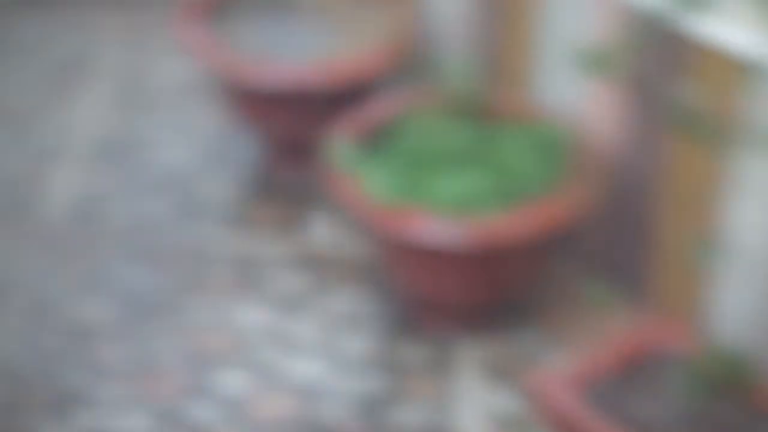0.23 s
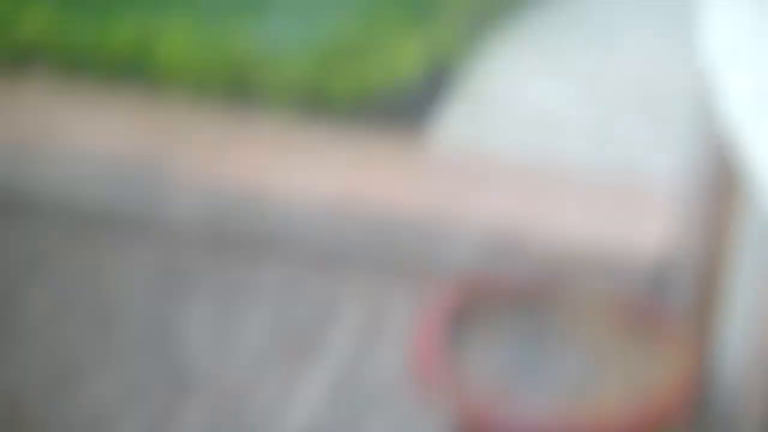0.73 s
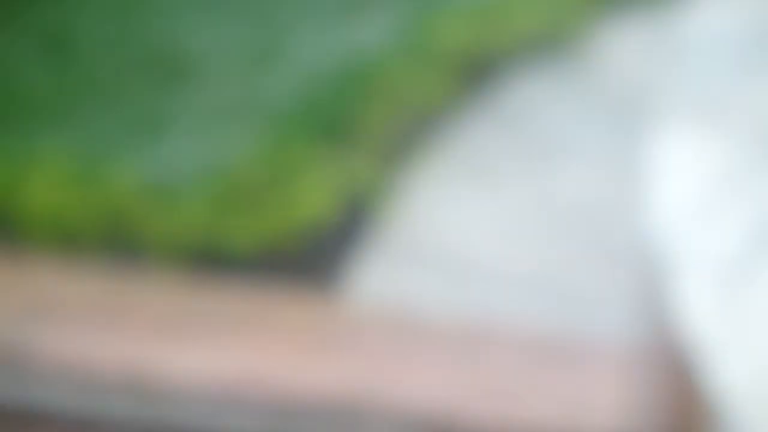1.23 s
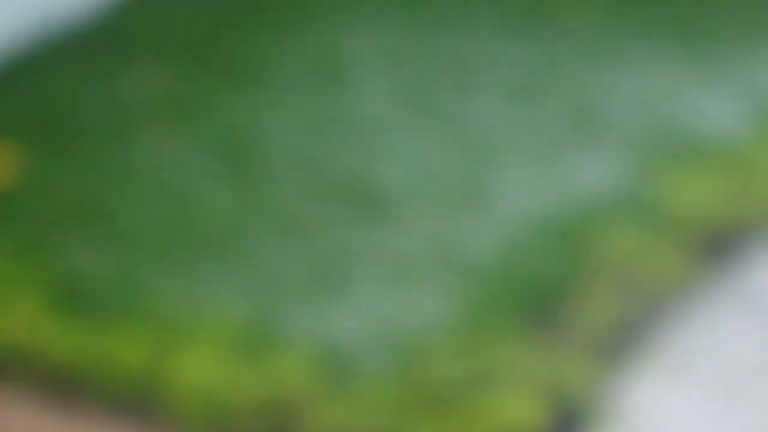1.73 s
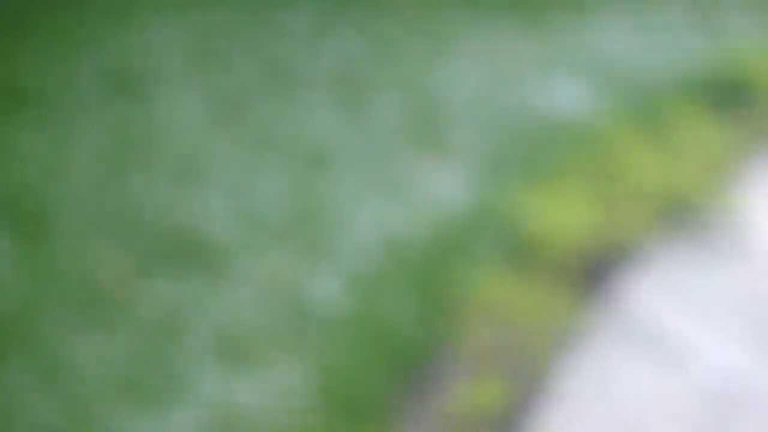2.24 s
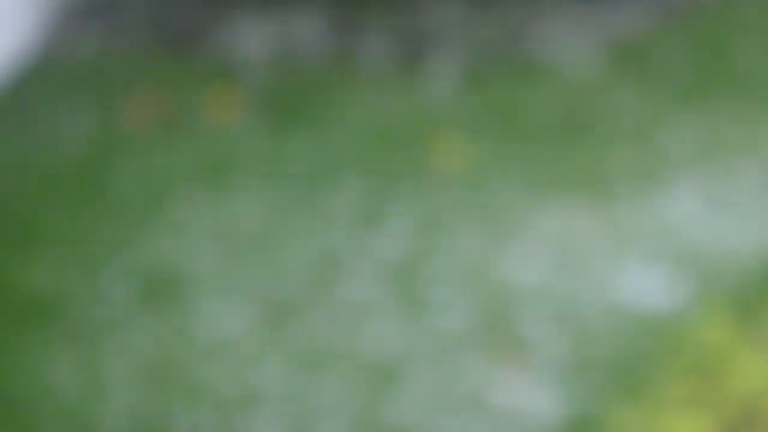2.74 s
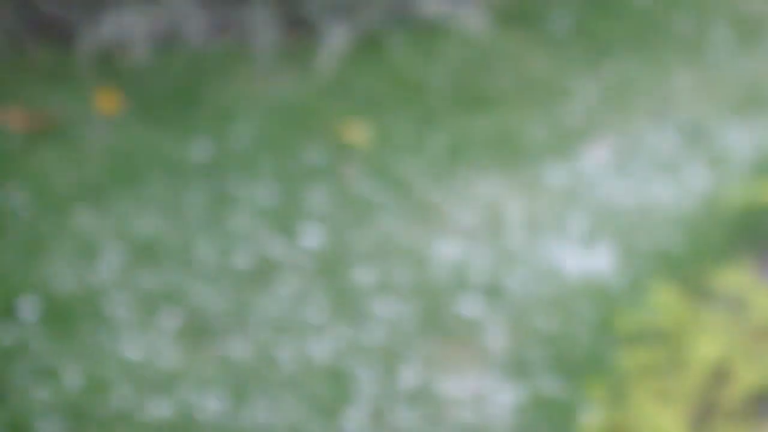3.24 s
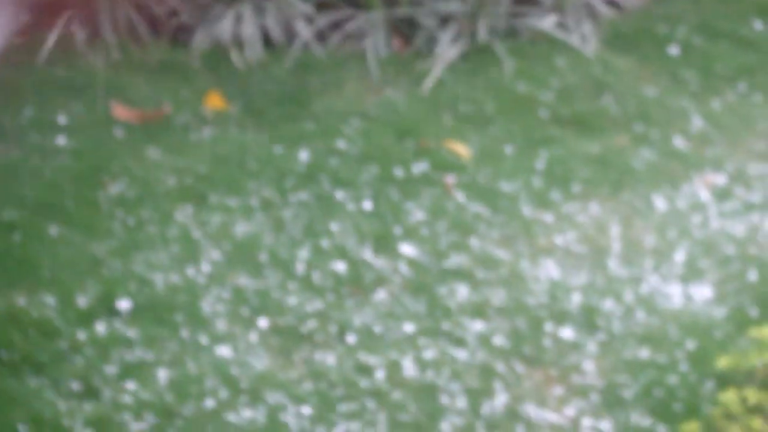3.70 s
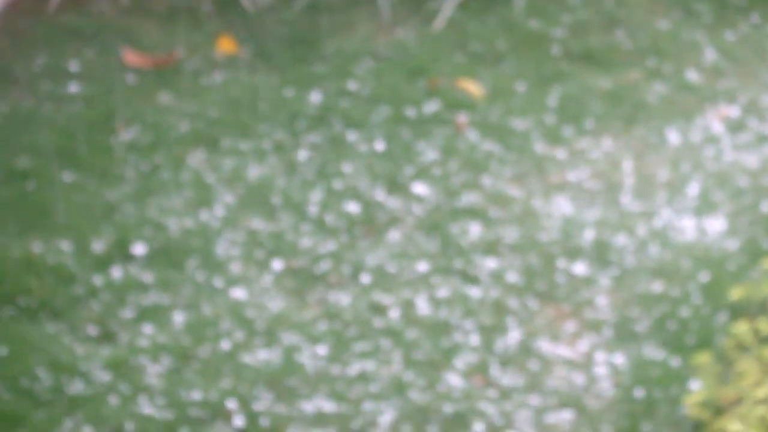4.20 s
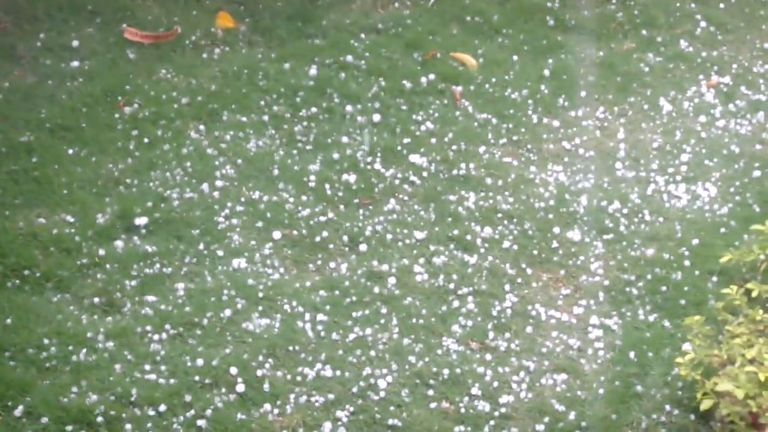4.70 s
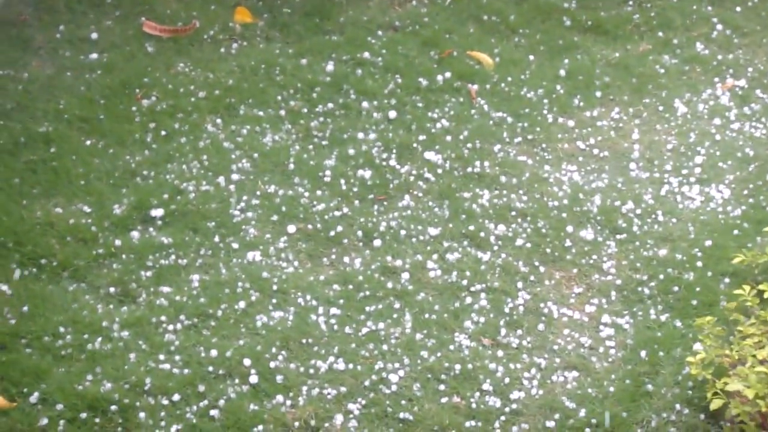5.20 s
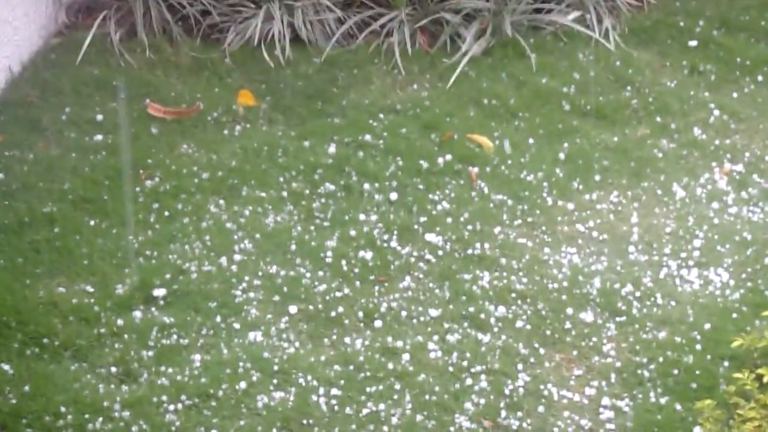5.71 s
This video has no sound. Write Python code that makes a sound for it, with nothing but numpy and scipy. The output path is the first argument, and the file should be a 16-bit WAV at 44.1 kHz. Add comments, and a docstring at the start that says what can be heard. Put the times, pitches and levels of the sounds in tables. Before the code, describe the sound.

Outdoors in a garden, hailstones come down steadily, heard close and wide through a handheld microphone. Sharp clicks on hard ground mix with soft, dull knocks on earth and a few small clay pot pings, over a hiss of countless farther impacts. Later the patter turns lighter and brighter as the knocks recede, with a few returning near the end.

```python
"""Hail on a yard and a lawn

Each impact is a short, damped vibration: stones tick sharply on paving, thud dully on soil, pots and
roof, and now and then ring a clay pot. The far ones superpose into a rush. A handheld camera hears
them through two microphone ports, and the thuds thin out as it turns to the lawn."""
import sys
import numpy as np
from scipy import signal
from scipy.fft import rfft, irfft, next_fast_len
from scipy.io import wavfile
from scipy.ndimage import uniform_filter1d, map_coordinates

SR = 44100
rng = np.random.default_rng(int(sys.argv[2]) if len(sys.argv) > 2 else 0)


def wav_record(signal):
    """Record a signal, one row per channel, as 16-bit PCM in the file named by sys.argv[1]."""
    frames = np.transpose(np.atleast_2d(signal))
    bounded = np.clip(frames, -1, 1)
    # unit amplitude maps onto the largest positive 16-bit level
    quanta = np.round(bounded * 32767).astype(np.int16)
    wavfile.write(sys.argv[1], SR, quanta)


N = 262395

# Phase difference of the ports, negative where the left lags: frequency_hz, left_lead_rad
PORT_PHASE = [(0, -0.5), (520, -1), (1120, -1.5), (3270, -1.84), (6200, -1.5), (8700, -3), (11800, -2.5)]
# Level difference of the ports: frequency_hz, left_minus_right_db
PORT_LEVEL = [(60, -5), (140, 6.5), (350, 4), (840, -0.5), (2010, -1), (4840, -1.5), (11600, 3)]


def amp(db):
    """Amplitude ratio of a level in decibels."""
    return 10 ** (np.asarray(db) / 20)


def unit(x):
    """Normalisation to rms 1."""
    return x / np.sqrt(np.mean(x ** 2) + 1e-20)


def along(points, hz):
    """Interpolation of (frequency_hz, value) points on a logarithmic axis."""
    f, v = np.transpose(points)
    return np.interp(np.log(hz + 1), np.log(f + 1), v)


def wobble(rate_hz):
    """Smooth random modulation: a spline through Gaussian knots."""
    return map_coordinates(rng.standard_normal(int(N * rate_hz / SR) + 4), [np.arange(N) * rate_hz / SR])


def filtered(x, response):
    """Linear filtering: the spectrum times a complex frequency response."""
    m = next_fast_len(N + 8192)
    return irfft(rfft(x, m) * response(np.fft.rfftfreq(m, 1 / SR)), m)[..., :N]


def impacts(peak_s, hz, gain, phase, cycles, samples):
    """Damped oscillation: each impact rises and dies within a few cycles."""
    life_s = np.clip(cycles, .2, 12) / hz[:, None]
    t = np.arange(samples) / SR
    age = 4 * t / life_s  # the envelope peaks at age 1
    pulses = gain[:, None] * age * np.exp(1 - age) * np.cos(2 * np.pi * hz[:, None] * t + phase[:, None])
    at = np.clip(np.round((peak_s[:, None] - life_s / 4) * SR), 0, N).astype(int) + np.arange(samples)
    return np.bincount(at.ravel(), pulses.ravel(), N + samples + 1)[:N]


def ports(pair, spectrum):
    """Partial coherence: two signals reach the ports as sum and difference; the left port lags."""
    # Likeness of the sound at the two ports: frequency_hz, coherence
    coherence = [(60, 0.33), (250, 0.99), (900, 0.71), (1600, 0.27), (3000, 0.3), (4500, 0.16),
                 (6500, 0.34), (9000, 0.62), (11000, 0.79)]
    angle = lambda hz: np.arccos(np.clip(along(coherence, hz), 0, 1)) / 2
    split = lambda hz: amp(along(spectrum, hz)) * [np.cos(angle(hz)), np.sin(angle(hz))]
    common, opposed = filtered(pair, split)
    half = lambda hz: amp(along(PORT_LEVEL, hz) / 2) * np.exp(.5j * along(PORT_PHASE, hz))
    return filtered(np.array([common + opposed, common - opposed]), lambda hz: [half(hz), 1 / half(hz)])


def patter(spectrum, lo_hz, hi_hz, cycles, spread_db, cap_db, far_db, count, samples):
    """Superposition: thousands of random impacts sound over the noise into which the far ones merge."""
    when, pitch, size, *turns = rng.random((count, 5)).T
    hz = lo_hz * (hi_hz / lo_hz) ** pitch
    size_db = np.minimum(-spread_db * np.log(1 - size), cap_db)  # many small stones, few large
    gain = hz * amp(size_db)  # even power per hertz
    stones = np.array([impacts(when * N / SR, hz, gain, 2 * np.pi * p, cycles, samples) for p in turns])
    noise = signal.stft(rng.standard_normal((2, N)), nperseg=256)[2]
    patches = rng.standard_normal(noise.shape[1:])
    for axis in (0, 1):  # smooth over frequency, then time
        patches = uniform_filter1d(patches, size=8, axis=axis)
    rush = signal.istft(noise * amp(1.5 * unit(patches)), nperseg=256)[1][:, :N]
    return unit(ports(stones, spectrum)) + amp(far_db) * unit(ports(rush, spectrum))


def thud_patter(deep_db):
    """Long contact on soft ground gives a dull spectrum; its lowest band fades first on the lawn."""
    # Spectrum of soft impacts: frequency_hz, gain_db
    dull = [(40, -50), (70, -51), (130, -16), (250, -5.5), (500, -1.5), (1100, 1), (1500, -2.5),
            (2200, -11), (4000, -19)]
    thuds = patter(dull, 150, 3000, cycles=.68, spread_db=1.5, cap_db=5, far_db=1, count=4000, samples=400)
    deep = filtered(thuds, lambda hz: 1 / (1 + (hz / 300) ** 2))
    return thuds + (amp(deep_db + 3.1 * wobble(14)) - 1) * deep


def tick_patter(lower_db):
    """Brief contact on hard paving gives a bright spectrum; over grass its lower band thins."""
    # Spectrum of hard impacts: frequency_hz, gain_db
    sharp = [(500, -25.5), (1300, -4), (2200, 0.5), (4000, -0.5), (6500, 1), (9000, 1.5), (11000, -2)]
    ticks = patter(sharp, 1200, 13000, cycles=2.6, spread_db=2, cap_db=8.5, far_db=3.5,
                   count=11000, samples=110)
    lower = filtered(ticks, lambda hz: 1 / (1 + (hz / 3500) ** 4))
    return ticks + (amp(lower_db) - 1) * lower


def close_stones(table, cycles, body_db, crack_db, echo_db, echo_s, aside, samples):
    """Direct sound and early reflection: contact, deeper body, brighter crack and two wall echoes."""
    peak_s, level_db, pitch_hz = np.transpose(table)
    turn, wait, wait_more, hardness = rng.random((len(peak_s), 4)).T
    tilt_db = 6 * (hardness - .5)  # harder stones crack more
    # delay_s, pitch_ratio, gain_db
    parts = [(0, 1.07, 0), (0, 0.58, body_db - tilt_db), (0, 1.8, crack_db + tilt_db)]
    parts += [(echo_s * (0.33 + w), 1, echo_db) for w in (wait, 1 + wait_more)]
    stereo = np.zeros((2, N))
    for channel, side in zip(stereo, (.5, -.5)):
        for delay_s, ratio, part_db in parts:
            hz = ratio * pitch_hz
            gain = amp(level_db + part_db + side * along(PORT_LEVEL, hz))
            phase = 2 * np.pi * turn + side * aside * along(PORT_PHASE, hz)  # less lag for stones ahead
            channel += impacts(peak_s + delay_s, np.minimum(hz, SR / 4), gain, phase, cycles, samples)
    return stereo


def close_thuds():
    """Heavy damping: soft ground stops the vibration almost at once."""
    # Loudest stones on soft ground: peak_s, level_db, pitch_hz
    thuds = [(0.0364, -8.5, 870), (0.1584, -12, 860), (0.2343, -11, 840), (0.2639, -12.5, 728),
             (0.3485, -9.5, 815), (0.436, -3.5, 920), (0.5002, -14, 793), (0.5264, -14, 855),
             (0.6562, -14, 1090), (0.706, -8, 940), (0.7518, -11, 866), (0.7663, -15, 1110),
             (0.7759, -14, 660), (0.8517, -12.5, 600), (0.878, -12.5, 630), (1.0758, -7, 872),
             (1.3143, -9.5, 830), (1.3744, -14, 715), (1.4298, -13.5, 970), (1.4678, -16, 850),
             (1.5042, -10, 728), (1.6251, -14, 890), (1.6807, -13, 735), (1.8099, -12.5, 765),
             (1.8183, -17, 867), (1.982, -13, 850), (2.0298, -16, 850), (2.0937, -11, 1020),
             (2.1283, -14.5, 705), (2.3329, -14, 850), (2.4046, -16.5, 678), (2.4571, -16, 896),
             (2.5071, -11, 880), (3.3968, -10, 990), (3.8127, -14.5, 899), (4.0559, -13.5, 900),
             (4.3769, -13, 925), (4.5487, -14, 754), (4.6214, -18, 570), (4.6593, -15, 1120),
             (4.8997, -11, 1285), (5.1736, -14, 1120), (5.396, -16.5, 1100), (5.5494, -7, 1064),
             (5.5667, -16, 715), (5.7085, -9.5, 1083), (5.7186, -17, 480), (5.7288, -13, 870),
             (5.8159, -12, 960)]
    return close_stones(thuds, cycles=1.45, body_db=-9, crack_db=-3.5, echo_db=-8, echo_s=.00145,
                        aside=1, samples=500)


def close_ticks():
    """Stiff contact: paving turns a stone back quickly, in a high click."""
    # Loudest stones on paving: peak_s, level_db, pitch_hz
    ticks = [(0.0446, -8, 6530), (0.0745, -10, 3670), (0.0827, -6, 6410), (0.12, -2, 7180),
             (0.2546, -11, 3230), (0.2651, -2, 6600), (0.2831, -8, 5900), (0.3488, -11, 2990),
             (0.451, -11, 5130), (0.5661, -11, 4550), (0.6123, -2, 7460), (0.6583, -7, 4660),
             (0.7651, -4.5, 4200), (0.771, -9, 4900), (0.8065, 1, 7200), (0.8489, -9, 3830),
             (0.8712, -14, 4200), (0.9146, -13, 7900), (0.9634, -8, 3200), (1.0357, -5, 5990),
             (1.1207, -9, 4440), (1.1757, -6, 6620), (1.2151, -3, 6700), (1.3023, -6, 6360),
             (1.3076, -9, 3930), (1.3366, -12, 3470), (1.3741, -15, 3000), (1.4371, -11, 7000),
             (1.465, -9, 5270), (1.5017, -2, 5270), (1.6182, -3, 6650), (1.8106, -1, 6300),
             (1.8535, -11, 6710), (1.9255, -2, 6810), (2.1279, -6, 4300), (2.2111, -6, 3500),
             (2.2304, -10, 2980), (2.2601, -6, 5590), (2.3905, -10, 6360), (2.4714, -1, 7150),
             (2.5736, -3, 5200), (2.644, -11, 6300), (2.7603, -14, 7370), (2.8215, -9, 6940),
             (2.8334, -4, 5760), (2.8555, -7, 5000), (2.9544, 1, 6950), (3.0873, 0.5, 5020),
             (3.2007, -5, 6520), (3.2097, -4.5, 5360), (3.2227, -6, 2700), (3.2636, -6, 4650),
             (3.3194, -7, 5650), (3.3614, -12, 6100), (3.4506, -11, 7000), (3.4985, -1, 7940),
             (3.551, -15, 3000), (3.6025, -1.5, 6700), (3.6617, -3, 5740), (3.8548, -7, 5000),
             (3.9224, -3, 5920), (4.1759, -8, 5960), (4.1993, -8, 6000), (4.2563, 2, 8500),
             (4.2893, -1.5, 3860), (4.3181, -12, 3000), (4.4243, -7, 4720), (4.524, -1, 5250),
             (4.532, -10, 5200), (4.553, -2.5, 6700), (4.8286, -7, 6800), (4.8722, -2, 6020),
             (4.9227, -6, 7920), (4.9622, 0, 7200), (5.0944, 1, 6860), (5.0992, -3, 5200),
             (5.1231, -9, 7010), (5.2136, -5, 3960), (5.2544, -7, 6320), (5.282, -5, 7345),
             (5.3116, -5, 5510), (5.3133, -6, 5440), (5.348, -2, 5200), (5.4045, -1, 6310),
             (5.4135, -2.5, 7860), (5.432, -8, 3600), (5.5279, -4, 4280), (5.7545, -3, 6960),
             (5.7658, -2, 5340), (5.8064, -4, 5230)]
    return close_stones(ticks, cycles=2.5, body_db=-13, crack_db=-7, echo_db=-11, echo_s=.0015,
                        aside=.65, samples=120)


def pot_pings():
    """Resonance: a struck clay pot rings for several cycles."""
    # Stones on a clay pot: peak_s, level_db, pitch_hz
    pings = [(0.519, -9.5, 3750), (1.3428, -13, 2160), (1.6405, -12, 2930), (2.8544, -12, 2750),
             (3.9238, -9.5, 2580), (5.197, -10, 4010), (5.3254, -11.5, 2730)]
    return close_stones(pings, cycles=6, body_db=-13, crack_db=-11, echo_db=-9, echo_s=.0012,
                        aside=.7, samples=400)


def camera_turn(left, right, t):
    """Time and level differences: as the camera turns, the left port lags more and the balance shifts."""
    # Balance during the turn: time_s, left_minus_right_db
    balance = [(0, 0.3), (2.4, -1), (3.2, 1.1), (5.95, 0.7)]
    drift_s = 5e-05
    delay_s = drift_s * (t / t[-1] - 0.35)
    lower = filtered(left, lambda hz: 1 / (1 + (hz / 7000) ** 6))  # the top treble keeps its lag
    delayed = map_coordinates(lower, [(t - delay_s) * SR], mode="nearest")
    swing = amp(np.interp(t, *np.transpose(balance)) / 2)
    return np.array([swing * (left - lower + delayed), right / swing])


def scene():
    """Common modulation: flurries swell both kinds of patter together, beneath the close stones."""
    # Strength of the patter: time_s, tick_level_db, thuds_minus_ticks_db
    fall = [(0.0, -22.5, -3.5), (0.5, -23.5, -2.5), (1.0, -23.5, -5), (1.45, -22, -5), (1.65, -26, -2),
            (1.9, -24, -4), (2.299, -24, -5), (2.7, -22.5, -10), (3.15, -23, -10), (3.503, -21.5, -10),
            (3.8, -22, -11), (4.2, -20.5, -11), (4.4, -24.5, -7.5), (4.7, -22, -11), (5.0, -22.5, -10.5),
            (5.35, -22.5, -10.5), (5.65, -23, -7), (5.95, -22, -6)]
    # Brief surges of hail: centre_s, half_width_s, thud_gain_db, tick_gain_db
    surges = [(0.742, 0.047, 4, -0.5), (2.1, 0.055, 3.5, 1.5), (2.792, 0.076, 3.5, 2.1),
              (4.1, 0.068, 6, 0.5), (4.86, 0.11, 4.5, 1.6), (5.188, 0.047, 5, 1)]
    t = np.arange(N) / SR
    time_s, *levels = np.transpose(fall)
    tick_db, share_db = [np.interp(t, time_s, level) for level in levels]
    surge_db = sum(np.array([[low_db], [high_db]]) * np.exp(-((t - centre_s) / width_s) ** 2)
                   for centre_s, width_s, low_db, high_db in surges)
    flurry = 0.57 * wobble(16) + 0.94 * wobble(40)
    lawn_db = share_db + 2.5  # negative as the thuds thin out over the lawn
    thuds = amp(tick_db + share_db + surge_db[0] + 0.84 * flurry) * thud_patter(deep_db=lawn_db)
    ticks = amp(tick_db + surge_db[1] + 0.82 * flurry) * tick_patter(lower_db=0.23 * lawn_db)
    close = close_thuds() + close_ticks() + pot_pings()
    left, right = thuds + ticks + filtered(close, lambda hz: 1 / (1 + (220 / (hz + 1)) ** 4))
    return camera_turn(left, right, t)


def record(dry):
    """Saturation and band limiting: the loudest cracks are squeezed, deep bass and top treble cut."""
    ceiling, low_hz, top_hz = .82, 85, 11050
    squeezed = dry / (1 + np.abs(dry / ceiling) ** 6) ** (1 / 6)
    return filtered(squeezed, lambda hz: 1 / (1 + (low_hz / (hz + 1)) ** 5) / (1 + (hz / top_hz) ** 300))


dry = scene()
out = record(dry)
wav_record(out)
```